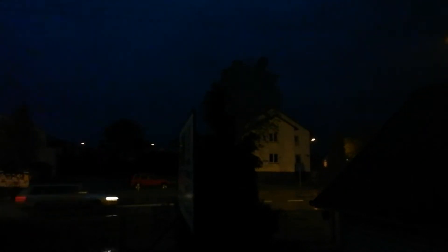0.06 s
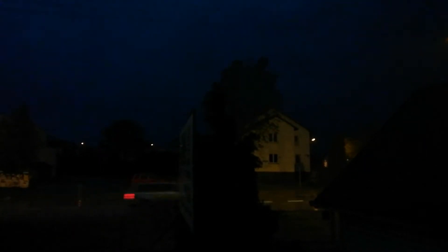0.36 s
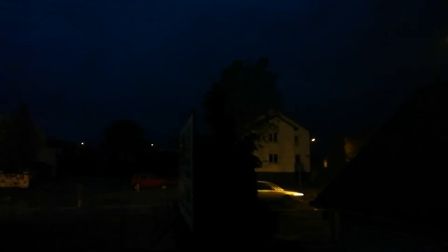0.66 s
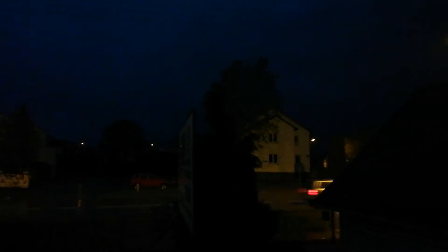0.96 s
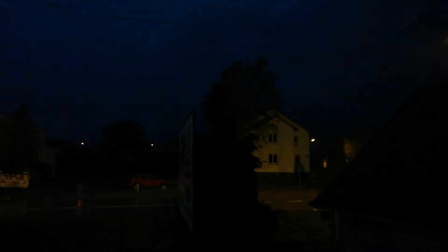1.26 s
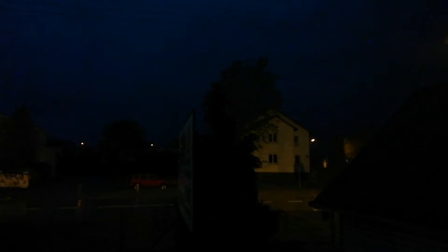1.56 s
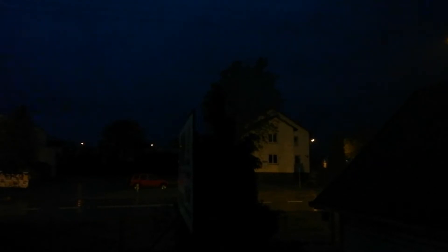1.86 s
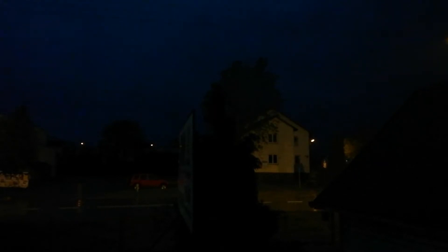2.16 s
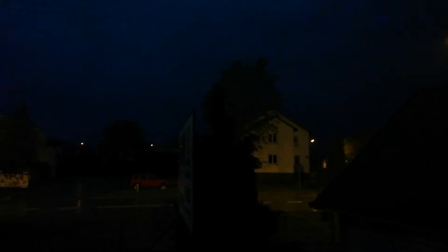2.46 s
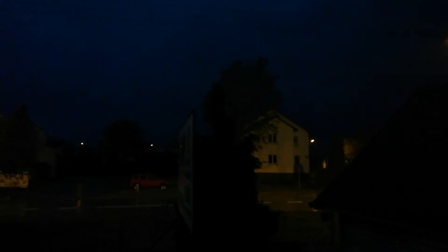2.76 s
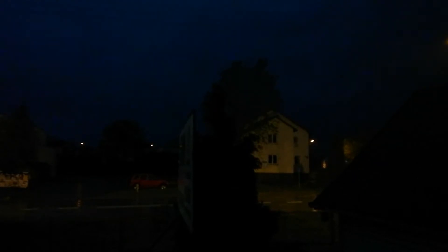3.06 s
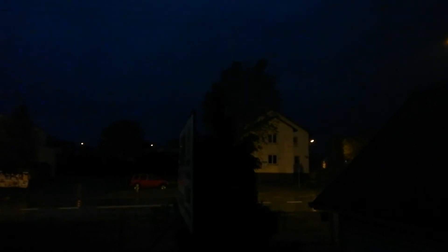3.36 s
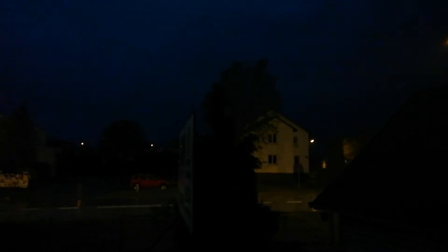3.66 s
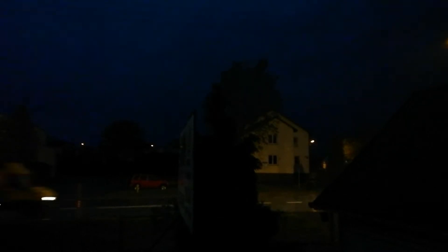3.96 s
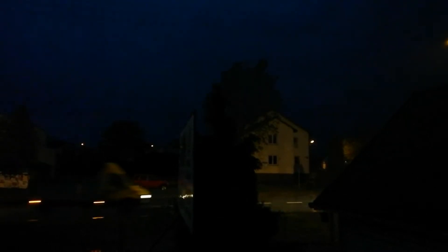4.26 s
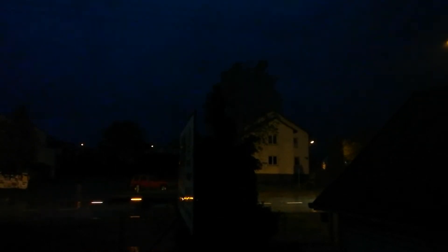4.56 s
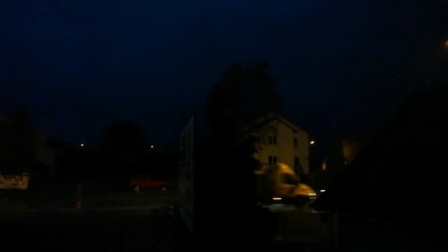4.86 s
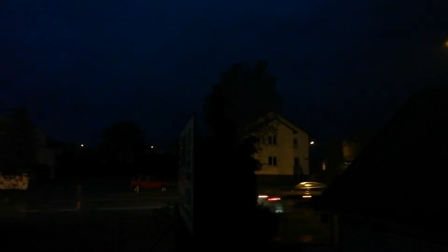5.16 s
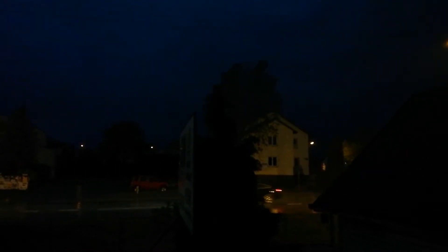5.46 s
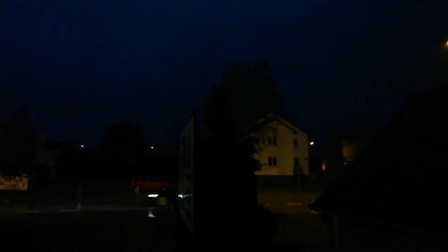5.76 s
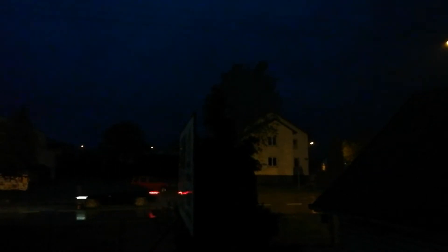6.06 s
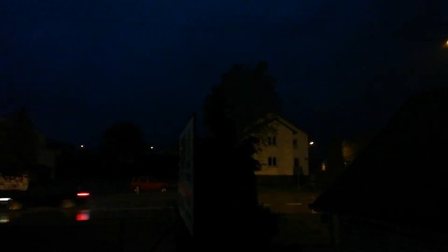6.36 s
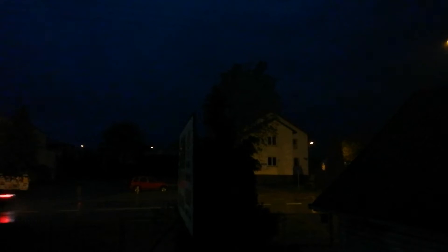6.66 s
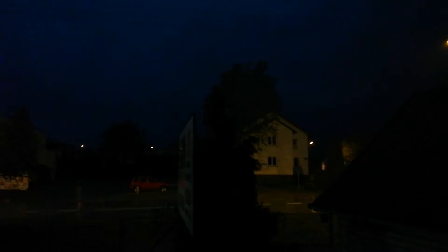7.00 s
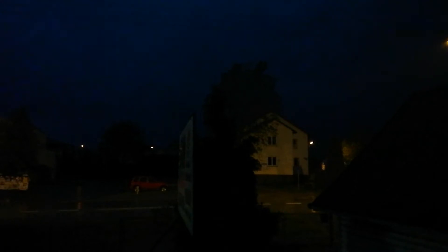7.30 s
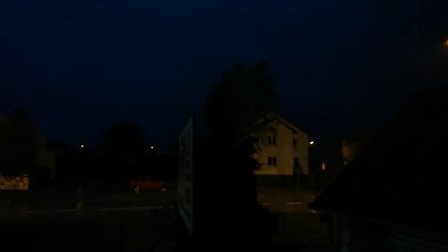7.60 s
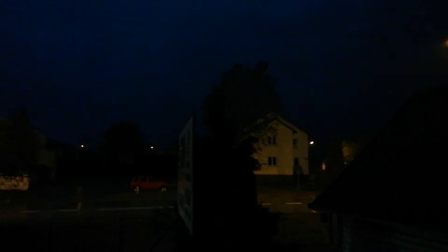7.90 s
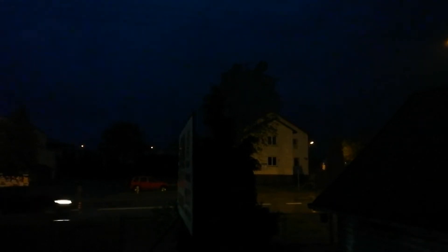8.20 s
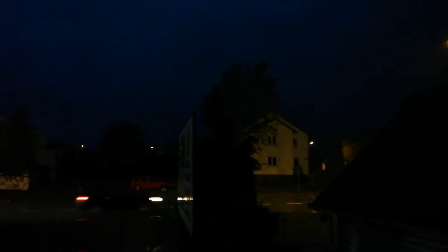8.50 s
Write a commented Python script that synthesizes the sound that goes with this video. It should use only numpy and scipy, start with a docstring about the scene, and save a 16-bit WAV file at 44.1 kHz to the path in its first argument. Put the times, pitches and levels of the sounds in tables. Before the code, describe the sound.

Steady rain hisses while passing vehicles throw up tyre spray, a lorry drones, and a few close drops tick.

```python
"""Wet street from a window

Evening rain, a two-port microphone about 15 m from the road. A car, a lorry, an oncoming car and one more
car swish over wet asphalt; their spray fades with distance and behind buildings, and each port colours it
by direction. Exhausts drone and boom between the houses, narrow bands whistle in the traffic, and a deep
rumble swells with the lorry. Rain hisses all around and a few drops tick on the sill, close to the mic."""
import sys
import numpy as np
from scipy import signal
from scipy.fft import rfft, irfft
from scipy.io import wavfile
from scipy.ndimage import uniform_filter1d

SR = 44100
rng = np.random.default_rng(int(sys.argv[2]) if len(sys.argv) > 2 else 0)


def generate_wav(sig):
    """Save sig (samples, or channels by samples) to the path in sys.argv[1] as 16-bit PCM at SR."""
    pcm = np.round(np.clip(np.atleast_2d(sig).T, -1, 1) * 32767).astype(np.int16)
    wavfile.write(sys.argv[1], SR, pcm)


N = 381024
TIME = np.arange(N) / SR
BIN_HZ = np.fft.rfftfreq(N, 1 / SR)
FRAME = 1024

# traffic past the window, positive speed to the right: name, ahead_at_s, speed_m_per_s, distance_m,
# length_m, gain_db, tilt_db_per_octave, direct_share, roar_db, tread_db
VEHICLES = [("first car", 0.41, 15.5, 14.1, 3.3, 0, 4.33, 0.37, 9.6, 3.8),
            ("lorry", 4.536, 14.16, 15.1, 18.7, -0.24, 0.54, 0.28, 0, 2),
            ("oncoming car", 5.67, -10.5, 15.4, 3.6, -3.5, .1, 0.48, -.5, 1),
            ("last car", 8.73, 15.8, 16, 3.1, -0.84, 0.082, 0.28, -.5, -2.2)]
# base spectrum of tyre spray: freq_hz, level_db
SPRAY_SPECTRUM = [(360.0, -82.5), (570.0, -81.5), (860.0, -75.5), (1160.0, -68.5), (1460.0, -73),
                  (1910.0, -71), (2310.0, -80.5), (3210.0, -73.5), (5510.0, -77.5), (8510.0, -75),
                  (11810.0, -81.5), (13310.0, -91.5), (15010.0, -100.5)]
# spray swells and dips with the depth of water: vehicle, centre_s, half_s, gain_db, tilt_db_per_octave
SPRAY_SURGES = [("first car", 0.1, 0.15, 0.74, 0.27), ("first car", 0.33, 0.041, 0.69, 0.23),
                ("first car", 0.52, 0.07, -1.2, -0.3), ("first car", 0.62, 0.04, 1, .2),
                ("first car", 0.728, 0.047, 2.6, .4), ("first car", 0.91, 0.1, 2.7, -0.45),
                ("first car", 0.96, 0.045, 2.6, -0.5), ("lorry", 2.76, 0.71, -1.5, 3.6),
                ("lorry", 3.08, .09, 1.0, 0.98), ("lorry", 3.32, 0.14, 2.9, 1.3),
                ("lorry", 3.69, 0.32, 5.2, -0.98), ("lorry", 3.91, 0.14, 1.7, 0.46),
                ("lorry", 4.12, 0.067, 1, 0.4), ("lorry", 4.5, 0.054, -1.3, -.6),
                ("lorry", 4.69, 0.097, 4.7, 1.1), ("lorry", 4.97, 0.065, 3.9, 0.55),
                ("lorry", 5.11, .035, 1.2, -.7), ("lorry", 5.22, 0.044, 2.9, 0.76),
                ("lorry", 5.32, 0.068, 3.8, 1.1), ("oncoming car", 6, .2, -.3, 0.1),
                ("oncoming car", 6.39, 0.028, 1.4, 0.83), ("oncoming car", 7.1, 0.07, 1.4, 0.55),
                ("oncoming car", 7.67, 0.96, 5.7, -.1), ("last car", 7.82, 0.25, 2.4, -.3),
                ("last car", 8.62, 0.11, -1.1, -0.4)]
# lorry exhaust, easing off as it passes: time_s, firing_hz
LORRY_FIRING = [(0, 60.55), (1.8, 61.46), (3.4, 61.5), (4.4, 60.44), (6.1, 57.87), (7.7, 55.2),
                (8.64, 55.1)]
# the lorry's far drone between booms: fundamental_db, octave_db
FAR_DRONE_DB = (-47.5, -55.5)
# that drone booms up between the houses: centre_s, half_s, fundamental_db, octave_db
LORRY_BOOMS = [(0.42, 0.18, -46, -44), (0.83, 0.058, -34.5, -50), (0.98, 0.05, -38, -53),
               (1.14, 0.055, -41, -53), (1.43, 0.18, -41.5, -59), (1.744, 0.28, -49, -46.5),
               (2.02, 0.08, -41.5, -52), (2.3, 0.14, -41, -46), (2.533, 0.14, -34, -62),
               (2.687, 0.077, -35, -44.5), (2.974, 0.097, -33, -64), (3.233, 0.26, -29, -42),
               (3.59, 0.32, -27.5, -54), (3.93, 0.24, -40, -41), (4.22, 0.14, -33.5, -39.5),
               (4.37, 0.15, -29, -48), (4.544, 0.092, -40, -42), (4.83, 0.29, -34, -69),
               (5.113, 0.06, -31.5, -56), (5.387, 0.092, -39, -54), (5.92, 0.084, -31, -56),
               (6.086, 0.12, -37, -51), (6.33, .05, -41, -48), (6.68, 0.14, -40.5, -57),
               (7.003, 0.074, -31, -52), (7.22, 0.06, -36.5, -50), (7.39, .09, -40.5, -58),
               (7.8, 0.19, -36, -51), (8.24, 0.1, -41, -46), (8.62, 0.19, -35.5, -62)]
# first car's exhaust: time_s, firing_hz, level_db
CAR_EXHAUST = [(0, 70.8, -41), (.47, 67.65, -33), (.64, 65.5, -38), (.73, 64.9, -48), (1.3, 64.2, -56),
               (3, 67.5, -74)]
# whistles and hums in the traffic: centre_s, half_s, pitch_hz, width_octaves, left_db, right_db
WHISTLE_BANDS = [(1.37, 0.4, 4760, 0.075, -76, -68), (1.35, 0.27, 3750, .13, -74, -79),
                 (1.2, 0.33, 1060, 0.2, -70, -72), (2.6, 0.49, 1100, .12, -73, -71.5),
                 (2.55, 0.75, 1990, 0.05, -68.5, -71.5), (3.2, .22, 8460, 0.11, -77, -64.5),
                 (3.16, 0.32, 3100, 0.051, -66, -74), (3.61, 0.21, 4000, 0.14, -78, -64),
                 (3.78, 0.2, 2270, .04, -63, -68), (3.93, .35, 1240, .06, -65, -59),
                 (3.9, .18, 2700, .07, -65, -74), (3.94, .15, 13100, .12, -74, -83),
                 (4.13, .17, 7900, 0.19, -77, -67), (0.27, .13, 1630, .09, -67, -67),
                 (.87, .17, 1780, 0.055, -59.5, -70), (5.05, .24, 1770, .055, -62.5, -71),
                 (5.27, .16, 4250, .1, -65, -76), (8.45, .4, 1030, .17, -68, -66.5),
                 (7.7, .7, 4800, .07, -77, -75), (3.68, 0.25, 267, 0.32, -68, -68),
                 (4.46, .09, 640, 0.33, -74, -68), (4.84, .55, 6900, 0.065, -82, -72),
                 (5.17, .35, 910, .2, -72, -67), (4.77, 0.24, 317, .2, -71, -68.5),
                 (7.15, 0.24, 213, .15, -70, -68), (7.75, .25, 2950, .1, -71, -73),
                 (8.6, .6, 3700, 0.24, -74, -77)]
# drops on the sill: start_s, level_db
SILL_DROPS = [(2.6094, -37), (4.702, -30), (5.661, -31.5), (7.8084, -37), (7.887, -36), (8.017, -30),
              (8.5729, -27.5)]
# base spectrum of the rain all around: freq_hz, level_db
RAIN_SPECTRUM = [(360, -80.5), (570, -77), (860, -72.5), (1160, -75), (1460, -71), (1910, -71), (2310, -73),
                 (2700, -75.5), (3210, -74.5), (3900, -75.5), (5510, -78), (8510, -82), (11810, -89),
                 (13200, -103), (15010, -109)]
# base spectrum of the road's rumble: freq_hz, level_db
RUMBLE_SPECTRUM = [(12, -85), (25, -85.5), (50, -71.5), (90, -77), (180, -79), (260, -78.9), (400, -90.5),
                   (700, -104)]
# rise and fall of the rumble: time_s, gain_db
RUMBLE_GAIN = [(0, 4.5), (1, -0.5), (3.05, 1.5), (3.45, 9.5), (3.8, 9.5), (4.15, 4.5), (4.7, 4.5),
               (5.15, 0.5), (6.4, 2.3), (8.64, 1.5)]
# directional peaks and notches of each microphone port:
# centre_hz, width_octaves, gain_db, strongest_at_deg, reach_deg, glide_octaves_per_deg
LEFT_PORT_LOBES = [(616, 0.26, 11, -6, 16, 0.0024), (920, 0.35, 8.5, -13.5, 35, 0.0078),
                   (1040, 0.13, 4.5, -65, 42, -0.018), (1335, 0.099, 9.5, -50, 21, -0.0076),
                   (1360, 0.072, -8, -11, 23, -0.00014), (1780, 0.22, 17.5, 11.5, 8.5, 0.0057),
                   (1830, 0.184, -7.5, -5, 45, -0.0056), (2050, 0.1, 14.5, -53.5, 42.4, 0.0058),
                   (2690, 0.11, 7.5, -5, 19, -0.0014), (2960, 0.073, 8, -46, 25, -0.0045),
                   (3600, 0.088, 8.5, -39, 12.8, 0.0013), (3970, 0.064, 5.5, 12, 8.2, -0.0002),
                   (4340, 0.33, 18.0, 12.6, 8, -0.008), (5200, 0.151, -4, -58, 30.9, -0.0014),
                   (5230, 0.94, -10, 11.5, 9.3, 0.0045), (5780, 0.28, 7.5, 1, 86, -0.0074),
                   (8220, 0.11, -5, -8, 42.2, -0.0082), (9070, 0.035, 5, 14, 7.0, -0.0068),
                   (9820, 0.214, 6.9, -3, 41, -0.0125), (13570, 0.13, -14.6, -85.0, 39, -0.0023),
                   (13610, 0.17, 3, -29.5, 8.0, -0.015), (14170, 0.056, -7.2, 15.2, 7.3, -0.0006)]
RIGHT_PORT_LOBES = [(574, 0.32, -13.6, 13, 7.0, -0.0035), (640, 0.26, -14.2, -49.7, 51.0, -0.011),
                    (720, 0.32, 11, 0.5, 18.5, 0.011), (915, 0.066, 8.5, 3, 43, -0.0073),
                    (1170, 0.083, 2.5, 6, 108.2, -0.016), (1238, 0.12, 13.5, -20.5, 24.4, -0.0036),
                    (1280, 0.44, 5.5, -47.5, 12, -0.03), (1670, 0.21, 9, -9, 20, 0.00014),
                    (2020, 0.079, -13, 13.2, 4.5, -0.0094), (2070, 0.073, 7, -61, 8.5, 0.0023),
                    (2360, 0.143, -6, -10, 14, -0.0087), (2514, 0.19, 17.5, 6.5, 58, 0.0013),
                    (2600, 0.076, -8, -62.0, 8.4, 0.015), (3320, 0.1, 12.5, 14.5, 12.5, -0.01),
                    (3530, 0.22, -8, -6, 19.4, 0.0033), (3920, 0.28, 7, -44.5, 28, 0.015),
                    (5470, 0.18, -10.5, 3.9, 36, 0.0008), (7120, 0.12, -15, -70.3, 50, 0.00034),
                    (8900, 0.39, 5.5, -40.5, 89, -0.015), (9560, 0.19, -6.5, 12, 11, 0.019),
                    (11340, 0.2, -9, -17.8, 104.6, 0.0033), (14220, 0.289, -7.6, -58, 26, -0.022)]
# the ports move together or against each other, by wavelength: freq_hz, correlation
PORT_CORRELATION = [(200, 0.53), (330, 0.53), (450, 0.057), (580, -0.56), (880, -0.009), (1130, -0.24),
                    (1600, 0.046), (1930, 0.32), (2400, -0.044), (3050, 0.22), (3800, -0.25), (4600, 0.014)]
# the right port is duller: freq_hz, left_minus_right_db
PORT_BALANCE = [(360.0, 0.5), (710.0, 2), (1160.0, 2), (1910.0, 1), (2610.0, 3), (3310.0, 0.5),
                (4510.0, -2), (8510.0, -0.5), (10010.0, 0.5), (11510.0, 10.5), (14000, 10.5), (15010.0, 8)]

# the street, in metres right of straight ahead: a shed hides its middle, houses hide both ends
SHED_M, SHED_HALF_WIDTH_M, SHED_DB = 0.93, 3.17, -3.5
LEFT_HOUSE_M, RIGHT_HOUSE_M, HOUSE_DB = -47, 7.72, -12.5
BASS_EDGE_M, TREBLE_EDGE_M = 2.6, 0.79  # low sound bends round a house further than treble
SHADOW_TILT = 0.28  # treble lost in a shadow, dB per octave for each dB
CORNER_DEG = 20.3  # sound from the right bends round the house corner, so its bearing stays under this


def tyres(motion, direct_share, roar_db, tread_db, tread_hz=1760, doppler=0.12, port_lag_s=0.000467):
    """Water thrown off the tyres reaches the nearer port first, and also scatters off the houses."""
    flutter = undb(1.04 * walk(30)) * np.sqrt(SR / 2)  # around 0 dB per Hz
    spray = [flutter * patter(per_second=7000, spread_db=4.8, wash=1.85) for _ in range(3)]
    hz, frame_s, (direct, *scatter) = signal.stft(spray, SR, nperseg=FRAME)
    hz = hz[:, None]
    bearing, pass_db, tilt = drive_past(frame_s, *motion)
    rightward = np.sin(np.radians(bearing))
    db = pass_db + colour(SPRAY_SPECTRUM, hz) - 0.93
    db += tilt * np.log2(np.maximum(hz, 300) / 2500)
    db += colour([(64, -5), (380, -0.5)], hz)  # spray has little bass
    db += roar_db * bump(hz, 630, octaves=0.98)  # the tyre carcass roars
    pitch_hz = tread_hz * (1 - doppler * rightward)
    db += tread_db * bump(hz, pitch_hz, octaves=0.09)  # the tread sings, higher from the left
    db += wall_comb_db(hz, rightward)
    port_phase = np.pi * hz * port_lag_s * rightward
    sides = []
    for lobes, sign, echo in zip((LEFT_PORT_LOBES, RIGHT_PORT_LOBES), (-1, 1), scatter):
        arriving = np.sqrt(direct_share) * direct * np.exp(1j * sign * port_phase)
        arriving += np.sqrt(1 - direct_share) * echo
        arriving *= undb(db + port_db(lobes, hz, bearing) + echo_ripple_db(db.shape))
        _, swish = signal.istft(arriving, SR, nperseg=FRAME)
        sides.append(swish[:N])
    return np.array(sides)


def drive_past(time_s, name, ahead_at_s, speed, distance_m, length_m, gain_db, tilt):
    """Bearing, level and tilt of a vehicle at steady speed: weaker with distance, duller in shadow."""
    along_m = speed * (time_s - ahead_at_s)
    bearing = np.degrees(np.arctan2(along_m, distance_m))
    bearing /= 1 + np.maximum(bearing, 0) / CORNER_DEG
    db = gain_db + shadow_db(along_m, length_m, BASS_EDGE_M)
    db -= 20 * np.log10(np.hypot(along_m, distance_m) / distance_m)
    tilt += SHADOW_TILT * shadow_db(along_m, length_m, TREBLE_EDGE_M)
    for vehicle, centre_s, half_s, surge_db, surge_tilt in SPRAY_SURGES:
        if vehicle == name:
            surge = swell(time_s, centre_s, half_s)
            db += surge_db * surge
            tilt += surge_tilt * surge
    return bearing, db, tilt


def shadow_db(along_m, length_m, edge_m):
    """Level lost behind the shed and the houses; a long vehicle takes longer to vanish."""
    past_corner_m = np.maximum(along_m - RIGHT_HOUSE_M, LEFT_HOUSE_M - along_m) - length_m / 2
    hidden = (1 + np.tanh(past_corner_m / edge_m)) / 2
    return SHED_DB * swell(along_m, SHED_M, SHED_HALF_WIDTH_M) + HOUSE_DB * hidden


def wall_comb_db(hz, rightward, depth_db=1.0, delay_s=0.0012, swing_s=0.00015, fade_hz=4000):
    """A wall near the mic reflects the spray: a hollow comb that sinks as a vehicle moves right."""
    late_s = delay_s + swing_s * rightward
    return depth_db * np.cos(2 * np.pi * hz * late_s) / (1 + (hz / fade_hz) ** 2)


def echo_ripple_db(shape, depth_db=1.22, span_bins=5, span_frames=19):
    """Echoes off many walls interfere: narrow peaks and dips that shift at random."""
    ripple = rng.standard_normal(shape)
    for size, axis in ((span_bins, 0), (span_frames, 1), (span_frames, 1)):
        ripple = uniform_filter1d(ripple, size, axis=axis, mode="wrap")
    return depth_db * ripple / ripple.std()


def engines():
    """Lorry and first car: two exhausts that beat against each other until the car has gone."""
    lorry_hz, = curves(LORRY_FIRING)
    fundamental_db, octave_db = lorry_drone_db()
    lorry = exhaust(lorry_hz, [fundamental_db, octave_db, octave_db - 11.5, octave_db - 37, octave_db - 20])
    car_hz, car_db = curves(CAR_EXHAUST)
    return lorry + exhaust(car_hz, [car_db, car_db - 17, car_db - 26])


def exhaust(firing_hz, harmonics_db, jitter=0.004, waver_db=0.5):
    """The lowest harmonics of the firing rate; each wavers on its way between the houses."""
    phase = 2 * np.pi * np.cumsum(firing_hz * (1 + jitter * walk(12))) / SR
    harmonics = [undb(db + waver_db * walk(12)) * np.sin(k * phase) for k, db in enumerate(harmonics_db, 1)]
    return np.sqrt(2) * sum(harmonics)


def lorry_drone_db():
    """Levels of the lorry's fundamental and octave: a far drone that fades at random, booms on top."""
    fades_db = (2.3 * walk(9), 4.5 * walk(15))
    power = np.array([undb(db + fade) ** 2 for db, fade in zip(FAR_DRONE_DB, fades_db)])
    for centre_s, half_s, fundamental_db, octave_db in LORRY_BOOMS:
        power += (undb([[fundamental_db], [octave_db]]) * swell(TIME, centre_s, half_s)) ** 2
    return 10 * np.log10(power)


def whistles():
    """Narrow bands ring out of the traffic noise, swell and die away."""
    out = np.zeros((2, N))
    for centre_s, half_s, pitch_hz, octaves, left_db, right_db in WHISTLE_BANDS:
        band = bump(BIN_HZ, pitch_hz, octaves) * np.sqrt(SR / 2)  # peaks at 0 dB per Hz
        ringing = irfft(rfft(rng.standard_normal((2, N))) * band, N)
        out += ringing * swell(TIME, centre_s, half_s) * undb([[left_db], [right_db]])
    return out


def sill_drops(tick_s=0.0036, splash_s=0.014, splash_db=-10, band_hz=(5500, 14000), pan_db=4):
    """Single drops hit the sill, close and to the left: a soft tick and a short fine splash."""
    out = np.zeros((2, N))
    t = np.arange(SR // 20) / SR
    envelope = np.exp(-t / tick_s) + undb(splash_db) * np.exp(-t / splash_s)
    for start_s, level_db in SILL_DROPS:
        start = int(start_s * SR)
        drop = undb(level_db) * envelope * rng.standard_normal((2, len(t)))
        out[:, start:start + len(t)] += drop[:, :N - start]
    return band_pass(out, band_hz) * undb([[pan_db], [-pan_db]])


def sprinkle(per_second=45, spread_db=3.2, decay_s=0.004, level_db=-68, band_hz=(9500, 15000), pan_db=4.5):
    """Many faint droplets land near the window at random: a fine, uneven crackle."""
    chance, size_draw = rng.random((2, N))
    hits = (chance < per_second / SR) * splash_size(size_draw, spread_db, cap=3)
    envelope = signal.lfilter([1], [1, -np.exp(-1 / (decay_s * SR))], hits)
    fizz = band_pass(envelope * rng.standard_normal((2, N)), band_hz)
    return fizz / fizz.std() * undb([[level_db + pan_db], [level_db - pan_db]])


def rain(gain_db=-0.7):
    """Steady rain on roofs, leaves and road all around, unrelated left and right."""
    fall = np.array([patter(per_second=1700, spread_db=4.2, wash=1.9) for _ in range(2)])
    return tint(fall * undb(gain_db), [(62, -105), *RAIN_SPECTRUM])


def rumble(roll_db=1.6, apart_hz=700):
    """Deep rolling rumble of the road; the longest waves are the same at both ports."""
    swell_db, = curves(RUMBLE_GAIN)
    mid, side = tint(rng.standard_normal((2, N)), RUMBLE_SPECTRUM) * undb(swell_db + roll_db * walk(6))
    side = signal.sosfilt(signal.butter(1, apart_hz, "high", fs=SR, output="sos"), side)
    return np.array([mid + side, mid - side])


def port_db(lobes, hz, bearing):
    """One microphone port colours the sound: its peaks and notches glide with the bearing."""
    total = 0
    for centre_hz, octaves, gain_db, strongest_deg, reach_deg, glide in lobes:
        moved_hz = centre_hz * 2 ** (glide * (bearing - strongest_deg))
        total += gain_db * swell(bearing, strongest_deg, reach_deg) * bump(hz, moved_hz, octaves)
    return total


def microphone_ports(x):
    """The two ports share some wavelengths and oppose others; the right one is duller."""
    left, right = rfft(x)
    alike = colour(PORT_CORRELATION, BIN_HZ)
    mid = np.sqrt(1 + alike) * (left + right) / 2
    side = np.sqrt(1 - alike) * (left - right) / 2
    balance_db = colour(PORT_BALANCE, BIN_HZ)
    return irfft(np.array([mid + side, mid - side]) * undb([balance_db / 2, -balance_db / 2]), N)


def patter(per_second, spread_db, wash):
    """Splashes of very unequal size over the even wash of distant ones; rms 1."""
    chance, size_draw = rng.random((2, N))
    splashes = (chance < per_second / SR) * splash_size(size_draw, spread_db, cap=5)
    splashes *= rng.choice([-1, 1], N)
    water = splashes / splashes.std() + wash * rng.standard_normal(N)
    return water / water.std()


def splash_size(draw, spread_db, cap):
    """Uniform draws to gains: many small splashes, few large, none above cap * spread_db."""
    return undb(spread_db * np.minimum(-np.log(1 - draw), cap))


def undb(db):
    """Decibels to gain."""
    return 10 ** (np.asarray(db) / 20)


def curves(table):
    """The columns of a table, joined by straight lines in time."""
    time_s, *columns = np.transpose(table)
    return [np.interp(TIME, time_s, column) for column in columns]


def colour(points, hz):
    """Values joined by straight lines on a log-frequency axis."""
    point_hz, values = np.transpose(points)
    return np.interp(np.log(hz + 1), np.log(point_hz), values)


def tint(x, spectrum):
    """Filter by a spectrum; unit white noise comes out at its dB per Hz."""
    return irfft(rfft(x) * undb(colour(spectrum, BIN_HZ)), N) * np.sqrt(SR / 2)


def band_pass(x, band_hz):
    """Keep one band, with gentle slopes."""
    return signal.sosfilt(signal.butter(2, band_hz, "band", fs=SR, output="sos"), x)


def walk(rate_hz):
    """Random levels held 1 / rate_hz seconds and smoothed twice."""
    hold = int(SR / rate_hz)
    steps = np.repeat(rng.standard_normal(N // hold + 1), hold)
    return uniform_filter1d(uniform_filter1d(steps, hold), hold)[:N]


def bump(hz, centre_hz, octaves):
    """A bell of height 1 on a log-frequency axis."""
    return np.exp(-np.minimum(np.abs(np.log2((hz + 1) / centre_hz) / octaves), 10) ** 2)


def swell(at, centre, half_width):
    """A bell of height 1 in time, in bearing or along the street."""
    return np.exp(-((at - centre) / half_width) ** 2)


def scene():
    """Rain and spray through the two ports, plus whistles, close drops, exhausts and rumble."""
    hiss = rain()
    for *motion, direct_share, roar_db, tread_db in VEHICLES:
        hiss += tyres(motion, direct_share, roar_db, tread_db)
    return microphone_ports(hiss) + whistles() + sill_drops() + sprinkle() + engines() + rumble()


def record(dry, top_hz=15650):
    """The recorder cuts the top steeply."""
    return signal.sosfilt(signal.ellip(10, 0.1, 80, top_hz, fs=SR, output="sos"), dry)


dry = scene()
out = record(dry)
generate_wav(out)
```